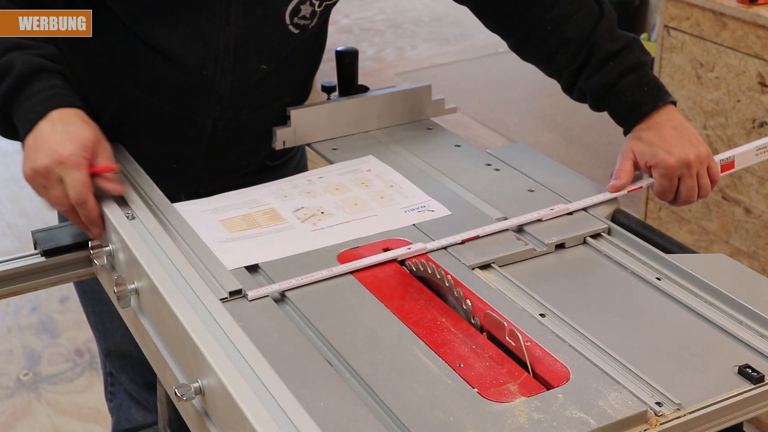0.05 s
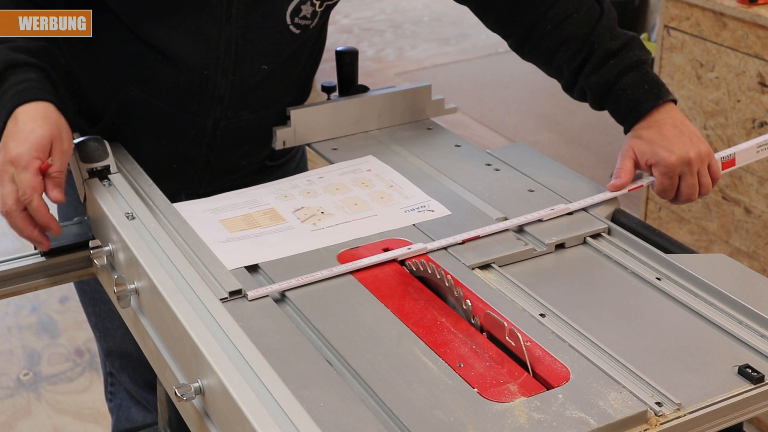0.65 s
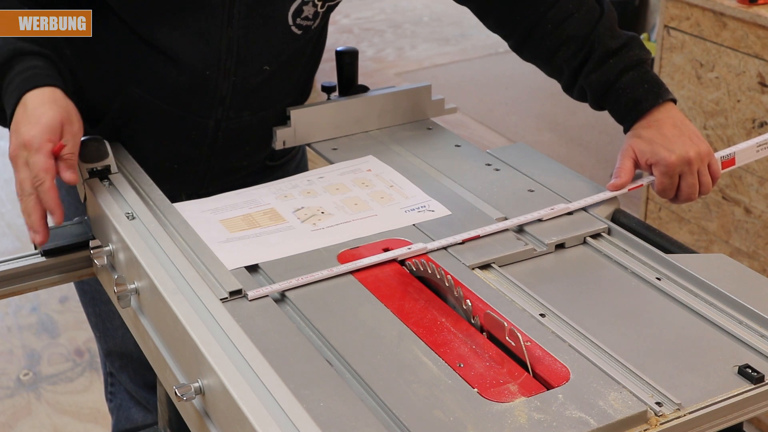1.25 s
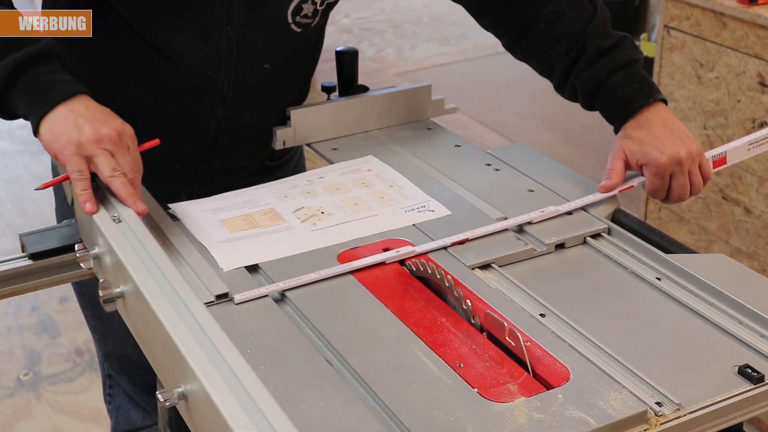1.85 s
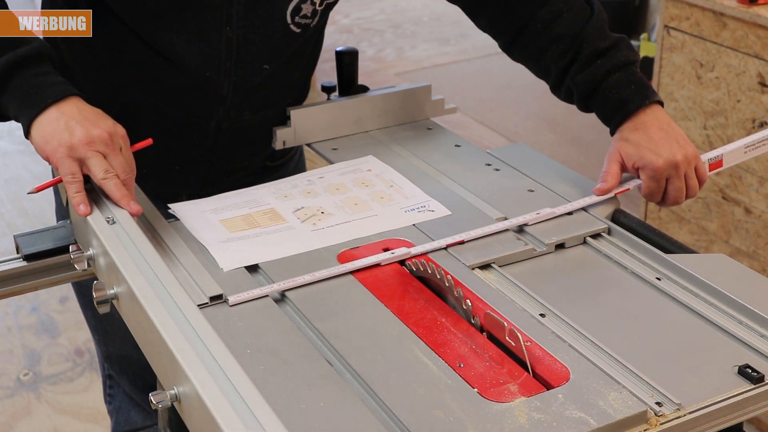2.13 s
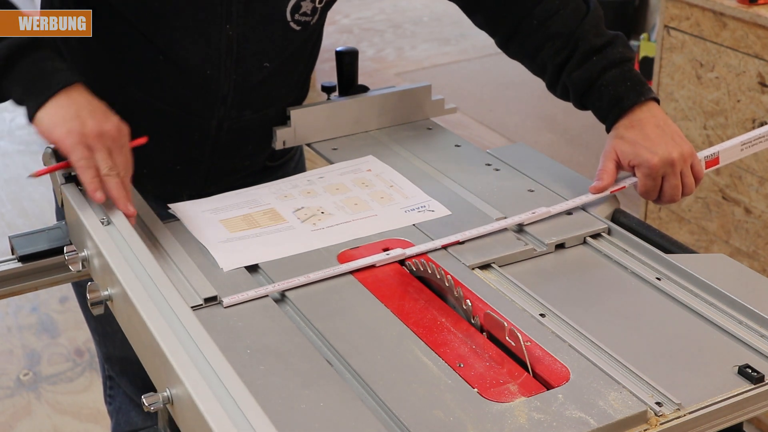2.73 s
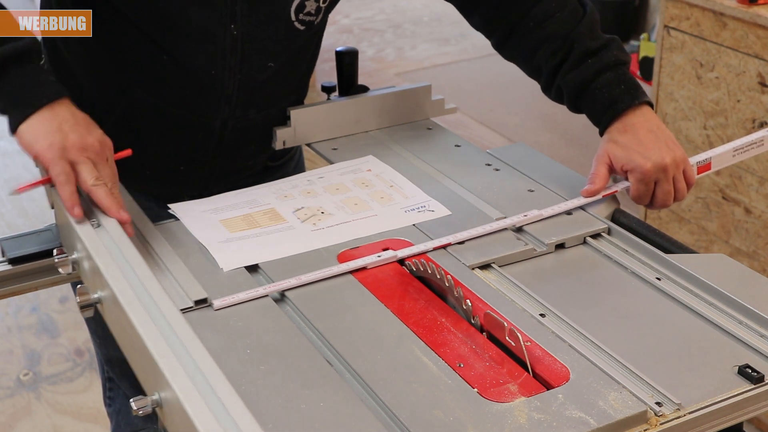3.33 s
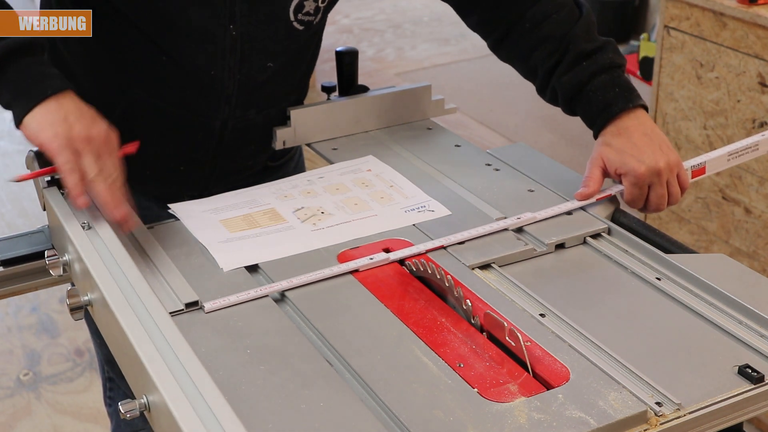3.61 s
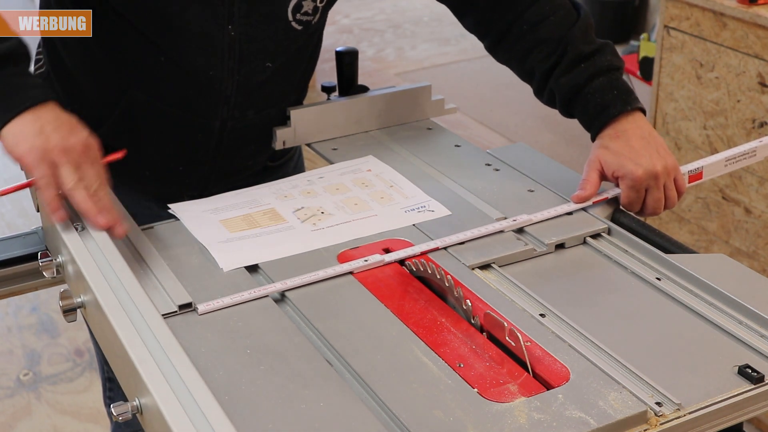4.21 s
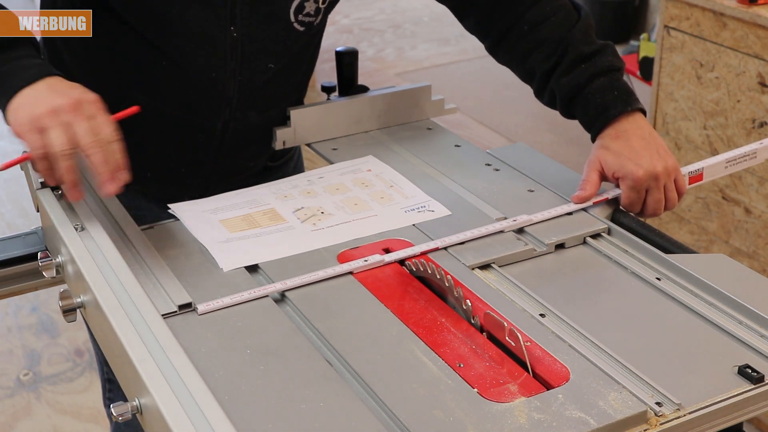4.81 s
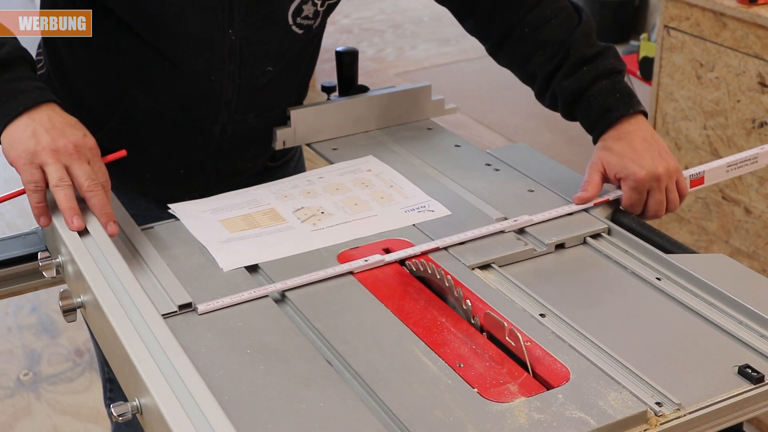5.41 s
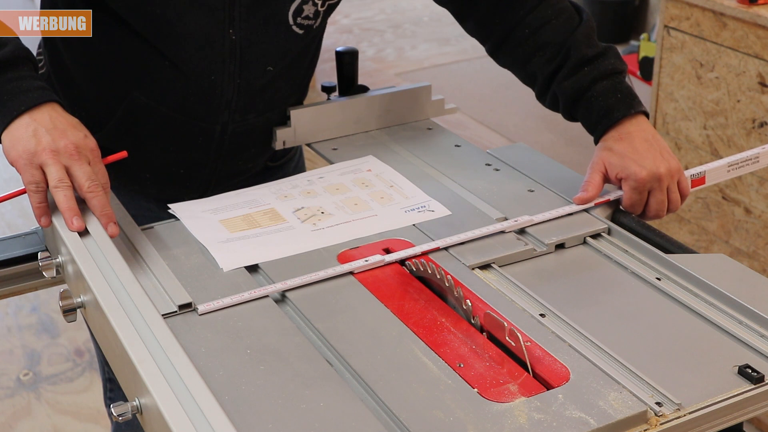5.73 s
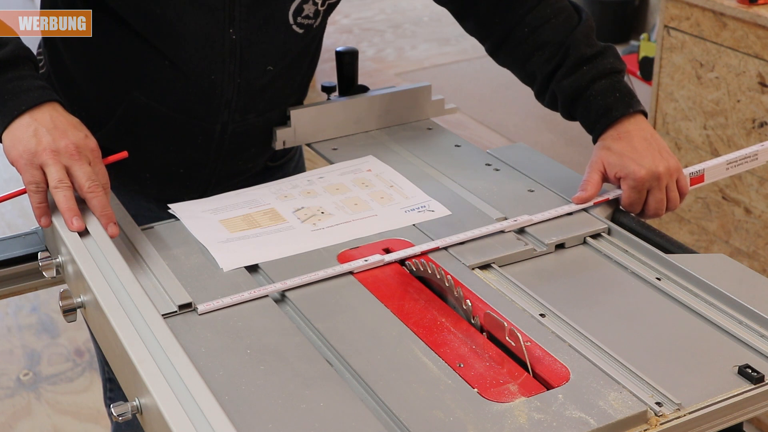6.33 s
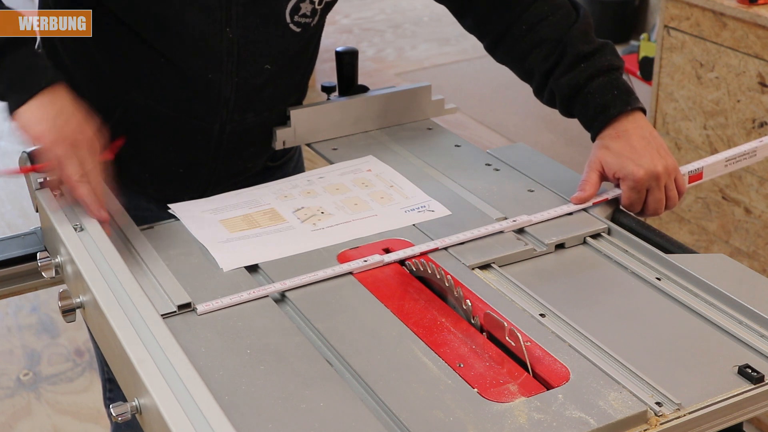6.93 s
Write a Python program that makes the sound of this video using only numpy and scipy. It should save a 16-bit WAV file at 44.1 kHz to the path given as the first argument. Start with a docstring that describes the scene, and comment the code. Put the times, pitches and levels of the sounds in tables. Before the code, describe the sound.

A hand adjusts the aluminium fence of an idle table saw, heard close and in stereo in a small workshop with a faint low hum and hiss. From about 0.5 to 1.2 seconds the clamp gives soft metallic clicks and its lever a few dull thuds. Around 1.7 to 2 seconds the fence slides quietly along its rail in two short pushes, with a slight shudder. From 2.7 to 4.7 seconds fingers nudge it with about ten louder knocks, roughly five a second. Each clacks, rattles and rings briefly over a low thump from the table, some with a sharp metal click. Between 3 and 4.1 seconds several end in a tiny scrape and high squeak. Only a few faint taps come between 5.4 and 6 seconds. A knock at 6.8 seconds and a firmer one at 7 end with a short, squeaky skid.

```python
"""Setting a table saw fence

A small workshop, close to an idle table saw, in mid-side stereo over a faint hum and hiss. A hand sets the
aluminium fence against a folding ruler: the clamp clicks, the fence is pushed along its rail, then nudged
on by light knocks of the fingers. Each knock makes it chatter in its play and ring, and sets the table
swinging; after some it skids a little, and stick-slip on the rail makes it squeak."""
import sys
import numpy as np
from scipy import signal
from scipy.fft import rfft, irfft, next_fast_len
from scipy.io import wavfile
from scipy.ndimage import uniform_filter1d

SR = 44100
rng = np.random.default_rng(int(sys.argv[2]) if len(sys.argv) > 2 else 0)


def waveform_to_disk(signal):
    """Save audio, clipped to [-1, 1], as 16-bit WAV at the path in sys.argv[1]."""
    frames = np.transpose(np.atleast_2d(signal))
    scaled = np.clip(frames, -1, 1) * 32767
    samples = np.round(scaled).astype(np.int16)
    wavfile.write(sys.argv[1], SR, samples)


N = 311478
TIME = np.arange(N) / SR
TAIL = TIME[:2 ** 15]  # seconds since a contact

# room tone in the mid and in the side channel: freq_hz, level_db
HISS_MID = [(20, -14), (35, -5), (60, -5), (100, 0), (135, -0.8), (200, -2), (450, -6), (900, -10.5),
            (2000, -14), (4000, -19), (8000, -26.5), (11500, -33), (14000, -47)]
HISS_SIDE = [(20, -10), (60, -30), (150, -8), (450, -6.5), (1200, -10), (3000, -14.5), (7000, -23.5),
             (11500, -32), (14000, -29)]
# decay of the workshop's echo, and of the metal's dense ring: freq_hz, t60_s
ROOM_DECAY = [(80, 0.61), (250, 0.99), (600, 0.75), (2000, 0.43), (5000, 0.68), (11000, 0.48)]
METAL_DECAY = [(80, 0.97), (300, 0.4), (1500, 0.35), (4000, 0.29), (11000, 0.095)]
# clear modes of the fence, relative to its dense ring: pitch_hz, level_db, t60_s
FENCE_MODES = [(226, 9, 0.44), (281.9, 5, 0.2), (311, 1.5, 0.2), (412.8, -1, 0.31), (461.8, 0.5, 0.15),
               (552, 7, 0.097), (592.4, 1, 0.26), (704, 3, 0.31), (854.5, 10.5, 0.15), (933, 9.5, 0.06),
               (1260, -0.5, 0.18), (1423, -7.5, 0.32), (1580, 1, 0.028), (1770, 1.5, 0.14), (2005, 4, 0.29),
               (2265, 4.5, 0.021), (2762, 5.5, 0.05), (3180, 7, 0.041), (3530, 0, 0.029), (4220, 0, .07),
               (4650, 2, 0.091), (5830, 6, 0.026)]
# what the fence radiates toward the microphone: freq_hz, gain_db
FENCE_COLOUR = [(30, -34), (60, -10), (110, -7), (170, -1.5), (198, -7.5), (225, 0), (280, 3), (480, -1.5),
                (750, -6.5), (1150, -10), (1750, -11.5), (2350, -17.5), (2780, -21), (3000, -24.5),
                (3200, -24.5), (4600, -32.5), (5200, -35.5), (5800, -36), (10500, -44), (13000, -55)]
# stereo width of the handling: freq_hz, side_gain_db
STEREO_WIDTH = [(60, -25), (200, -46), (500, -19.5), (1200, -12.5), (2000, -11), (3200, -3.5), (6000, 2.5),
                (11000, 5.5)]
# slow pushes along the rail: start_s, length_s, level_db, relative_grit_db
RAIL_PUSHES = [(-.08, 0.19, -68.5, 14.5), (1.65, 0.18, -52, 2), (1.851, 0.14, -50.5, -6)]
# colour of steady sliding friction: freq_hz, gain_db
FRICTION_COLOUR = [(60, 6), (160, 4), (228, -2), (290, -0.5), (520, -2), (850, -2.5), (2000, 5), (4000, 6),
                   (10000, 9.5)]
# finger knocks: start_s, level_db, chatter_s, bite_db, clack_db, edge_db, hand_weight_db, bending_db
FINGER_KNOCKS = [(0.505, -56, 0.02, 10, 5, 13, -60, -54), (0.642, -54, .037, 0, 3, 7, -85, -75),
                 (0.809, -50.5, 0.0086, 6.5, 1, 11.5, -60, -54.5),
                 (1.084, -51.5, 0.021, 7.5, 5, 8, -61.5, -55), (2.547, -64.5, 0.0068, -8, -9, 12, -83, -62),
                 (2.704, -37, 0.022, 4, 4, -2, -55, -49),
                 (2.953, -34, 0.0095, -1.5, -0.5, -3.5, -53.5, -45),
                 (3.159, -37.5, 0.011, -1.5, -2, 1, -53.5, -65),
                 (3.366, -34, 0.014, 0.5, 2.5, -1.5, -56.5, -43),
                 (3.57, -33.5, 0.015, -0.5, 1, -0.5, -58.5, -42.5),
                 (3.776, -39, 0.034, -2.5, 0.5, -5, -60.5, -51), (3.974, -42.5, 0.0078, -5, 5, 4, -75, -70),
                 (3.981, -28.5, 0.01, 2, 2.5, -6, -51, -36.5), (4.182, -42, 0.017, 4, -2.5, -1, -53, -43),
                 (4.408, -31, 0.014, 1.5, 4, -6, -48, -41.5),
                 (4.619, -35.5, 0.0065, 2, -1.5, -1, -49.5, -60),
                 (4.639, -37.5, 0.005, -15, -1, -8, -62, -61), (5.401, -64.5, 0.016, 6, -1, -7, -88, -83),
                 (5.773, -60.5, 0.017, -3, 0, -9, -89, -70), (5.989, -54.5, 0.004, 9, 12, -4, -86, -51),
                 (6.786, -40, 0.021, -2.5, -9, -3, -64, -44.5), (6.994, -51, 0.0067, -1, 3, 4, -80, -75),
                 (7.005, -31.5, 0.0097, -7, 4.5, 0, -63, -37)]
# low modes of the saw table, and slow bending of the whole fence: pitch_hz, level_db, t60_s
TABLE_MODES = [(70, -21, 0.94), (81.3, 3, 1), (143.6, -3, 0.68), (175, -2, 1), (234.8, -1, 0.49)]
BENDING_MODES = [(228.5, -2, 0.29), (285, -1, 0.51), (321.7, -1.5, 0.45)]
# long notes of the fence's hollow profile: pitch_hz, level_db, t60_s
PROFILE_MODES = [(581, -1, 0.51), (899, -1.5, 0.57), (1063, -4.5, 0.4), (1213, -1.5, 0.11),
                 (1546, -10.5, 0.47), (2230, -9, 0.37), (2790, -34, 0.46), (4670, -23, 0.2)]
# the hand bears down on the clamp lever: start_s, length_s, level_db, tilt_db_per_octave
LEVER_BUMPS = [(.52, .06, -58, 0), (0.833, 0.087, -50.5, 1), (1.168, 0.07, -51, -2.5)]
# dull body of the lever and its mount: pitch_hz, level_db, t60_s
LEVER_MODES = [(87, -1, 1), (161.5, -3.5, 0.53), (229, -3, 0.45), (280.4, -0.5, 0.37), (451.4, -7, 0.24),
               (518, -5.5, 0.23)]
# small steel parts of the clamp: pitch_hz, level_db, t60_s
CLAMP_MODES = [(2600, -52, 0.079), (4900, -62, .12), (5700, -50.5, 0.05), (6100, -57, 0.1),
               (10180, -49, 0.016), (10600, -62, 0.03)]
# metal on metal, at the clamp and the rail: start_s, level_db, treble_db
METAL_CLICKS = [(0.586, -58.5, 22.5), (0.606, -63.5, 22), (0.821, -55.5, 9), (1.097, -52.5, 7),
                (1.63, -64, 10), (2.712, -48, 8), (2.722, -46, 8), (2.728, -55, 11), (3.166, -55, 15),
                (3.783, -42.5, 7), (4.013, -46, 12.5), (4.417, -40, 7), (4.436, -42, 0), (6.79, -48, 15),
                (7.002, -48.5, 18.5)]
# taps that land on bare metal: start_s, level_db, tilt_db_per_octave
BARE_TAPS = [(.815, -60.5, 1), (1.096, -56.5, 2), (4.412, -49, 2.5), (4.635, -55.5, 4.5), (5.991, -59.5, 0)]
# what the bare metal rings with: pitch_hz, level_db, t60_s
BARE_MODES = [(1522, -2, 0.28), (1554, -1.5, 0.39), (1530, -7, 0.19), (1720, -8, .3), (2566, -12, .27),
              (2790, -9.5, .3), (3420, -19, .35), (3840, -15, .2), (4250, -17.5, 0.35), (4600, -19.5, 0.22),
              (4660, -16, 0.18)]
# a pressing fingertip drags on the fence: start_s, length_s, level_db
FINGER_DRAGS = [(1.735, 0.11, -53), (1.915, 0.12, -51.5), (2.708, 0.11, -42.5)]
# low modes that the drag shakes: pitch_hz, level_db
DRAG_MODES = [(227.8, 3), (171, -10)]
# short skids along the rail: start_s, length_s, scrape_db, squeak_db, relative_overtone_db
RAIL_SKIDS = [(2.766, 0.098, -47, -76, -20), (3.03, 0.04, -45.5, -55, -20), (3.123, 0.027, -52, -66, -14),
              (3.224, 0.049, -40, -37, -21), (3.425, 0.04, -37.5, -36.5, -19),
              (3.631, 0.04, -39.5, -39, -19), (3.673, 0.027, -42.5, -60, -14),
              (4.051, 0.04, -41.5, -34, -23), (6.873, 0.047, -56, -62, -22),
              (7.009, 0.037, -34.5, -38.5, -24), (7.046, 0.024, -44, -34.5, -22)]
# colour of a skid's scrape: freq_hz, gain_db
SCRAPE_COLOUR = [(300, 2.5), (900, 3), (1750, 10.5), (2500, 5.5), (3500, 6.5), (5000, 5), (9000, 5)]

FIRM_DB = -35  # level of a firm knock
WEIGHT_LAG_S = 0.0288  # the hand's weight lands this long after a knock


def undb(db):
    """Decibels to gain."""
    return 10 ** (np.asarray(db) / 20)


def unit(x):
    """Scale to an rms of one."""
    return x / np.sqrt(np.mean(x ** 2))


def lookup(points, hz):
    """Read (freq_hz, value) points on a log-frequency axis."""
    f, value = np.transpose(points)
    return np.interp(np.log(np.maximum(hz, 1)), np.log(f), value)


def causal(x, gain_at):
    """Minimum-phase filter; gain_at gives the gain for an array of frequencies."""
    size = 2 * next_fast_len(x.shape[-1])
    cepstrum = irfft(np.log(gain_at(np.fft.rfftfreq(size, 1 / SR))))
    cepstrum[1:size // 2] *= 2
    cepstrum[size // 2 + 1:] = 0
    return irfft(rfft(x, size) * np.exp(rfft(cepstrum)))[..., :x.shape[-1]]


def colour(x, points):
    """Filter by (freq_hz, gain_db) points."""
    return causal(x, lambda hz: undb(lookup(points, hz)))


def even(x, band_hz=160):
    """Flatten a random burst to unit power, averaged over stretches of band_hz."""
    def gain_at(hz):
        power = np.abs(rfft(x, 2 * len(hz) - 2)) ** 2
        return (uniform_filter1d(power, int(band_hz / hz[1])) + 1e-12) ** -.5
    return causal(x, gain_at)


def through(x, response):
    """Convolve, keeping the length."""
    return signal.fftconvolve(np.atleast_2d(x), np.atleast_2d(response), axes=-1)[:, :x.shape[-1]]


def add(out, s, sound):
    """Mix a sound in at time s."""
    start = max(int(s * SR), 0)
    out[:, start:start + sound.shape[-1]] += sound[..., :max(N - start, 0)]


def wander(size, rate_hz):
    """Smooth random motion with an rms of one, up to about rate_hz."""
    return unit(signal.sosfilt(signal.butter(4, rate_hz, fs=SR, output="sos"), rng.standard_normal(size)))


def grains(size, per_s, spread_db):
    """Tiny random collisions of uneven strength."""
    hits = (rng.random(size) < per_s / SR) * rng.choice([-1, 1], size)
    return hits * undb(spread_db * rng.standard_normal(size))


def dying_noise(t60s, band_count=6):
    """Countless overlapping modes: noise whose bands each die at their own rate."""
    spectrum = rfft(rng.standard_normal(len(TAIL)))
    centres_hz = np.geomspace(80, 11000, band_count)
    place = np.interp(np.fft.rfftfreq(len(TAIL), 1 / SR), centres_hz, np.arange(band_count))
    bands = irfft(spectrum * np.maximum(1 - np.abs(place - np.arange(band_count)[:, None]), 0))
    decay = np.exp(-np.log(1000) * TAIL / lookup(t60s, centres_hz)[:, None])
    return even(np.sum(bands * decay, axis=0))


def swing(modes, press_s, detune, flutter_db):
    """Modes set swinging by one push; the hand's load shifts them and makes them die unevenly."""
    hz, db, t60 = np.transpose(modes)[:, :, None]
    loaded_hz = hz * (1 + detune * rng.standard_normal(hz.shape))
    uneven_db = flutter_db * np.tanh(wander((len(modes), len(TAIL)), rate_hz=23.5))
    envelope = undb(db + uneven_db) * np.exp(-np.log(1000) * TAIL / t60)
    ring = envelope * np.sin(2 * np.pi * (loaded_hz * TAIL + rng.random(hz.shape)))
    return np.sqrt(2) * (1 - np.exp(-TAIL / press_s)) * np.sum(ring, axis=0)


def tilted(modes, db_per_octave):
    """The same modes, brighter or duller as if struck harder or softer."""
    return [(hz, db + db_per_octave * np.log2(hz / modes[0][0]), t60) for hz, db, t60 in modes]


def room_tone(hum_hz=99, hum_db=-68.5, waver=0.018, mid_db=-65.5, side_db=-62):
    """Smooth hiss all round the microphone, and a low, slightly wavering hum in the centre."""
    drift = unit(uniform_filter1d(rng.standard_normal(N), size=4000))
    hum = undb(hum_db) * unit(np.sin(2 * np.pi * np.cumsum(hum_hz * (1 + waver * drift)) / SR))
    mid = undb(mid_db) * unit(colour(rng.standard_normal(N), HISS_MID))
    side = undb(side_db) * unit(colour(rng.standard_normal(N), HISS_SIDE))
    return np.array([mid + hum, side])


def echo(wall_s=.012):
    """Mid and side echo off the workshop's near walls; it differs with the spot that sounds."""
    tail = np.array([dying_noise(ROOM_DECAY), dying_noise(ROOM_DECAY)])
    return np.pad(tail, ((0, 0), (int(wall_s * SR), 0)))[:, :len(TAIL)]


def fence_modes(spot_db=1.5):
    """The clear modes of the fence; how hard each is driven depends on the spot."""
    hz, db, t60 = np.transpose(FENCE_MODES)[:, :, None]
    decay = np.log(1000) / t60
    weight = undb(db - spot_db * rng.standard_normal(hz.shape)) * rng.choice([-1, 1], hz.shape)
    return np.sum(2 * decay / SR * weight * np.exp(-decay * TAIL) * np.sin(2 * np.pi * hz * TAIL), axis=0)


def fence(crack_db=-5, echo_db=-6):
    """One contact as it reaches the microphone, mid and side: crack, clear modes, dense ring and room."""
    mid = dying_noise(METAL_DECAY) + fence_modes()
    mid[0] += undb(crack_db)
    side = dying_noise(METAL_DECAY)
    response = colour(np.array([mid, side]) + undb(echo_db) * echo(), FENCE_COLOUR)
    return response / np.linalg.norm(response[0])


def sliding_speed(s, length_s, attack_s=0.083, release_s=0.051):
    """A push gathers speed, holds it and runs out."""
    return np.clip((TIME - s) / attack_s, 0, 1) * np.exp(-np.maximum(TIME - s - length_s, 0) / release_s)


def pushes(sing_hz=(9750, 10500), sing_db=(-32, -27), width_hz=450, flutter_db=3, grit_hz=3000, grit_db=3):
    """Steady sliding: grains of friction drive the fence; grit makes the rail hiss and sing fitfully."""
    speed = sum(undb(db) * sliding_speed(s, length_s) for s, length_s, db, _ in RAIL_PUSHES)
    gritty = sum(undb(db + extra_db) * sliding_speed(s, length_s)
                 for s, length_s, db, extra_db in RAIL_PUSHES)
    grit = unit(grains(N, per_s=630, spread_db=5))
    grit = signal.lfilter(*signal.butter(2, grit_hz, "high", fs=SR), grit)
    friction = colour(unit(grains(N, per_s=2900, spread_db=5)), FRICTION_COLOUR)
    out = through(speed * friction + undb(grit_db) * gritty * grit, fence())
    for hz, db in zip(sing_hz, sing_db):
        sing = signal.lfilter(*signal.iirpeak(hz, hz / width_hz, SR), rng.standard_normal((2, N)))
        out += undb(db) * gritty * unit(sing * undb(flutter_db * wander(N, rate_hz=17)))
    return out


def contact(db, rise_s, chatter_s, body_db, bite_db, clack_db, edge_db, blow_s=0.061, tick_db=-17):
    """A blow shakes the fence in its play on the rail: a tick, then a dying burst of collisions."""
    tick = signal.lfilter(*signal.butter(2, 6500, "high", fs=SR), signal.unit_impulse(len(TAIL)))
    age, rise = TAIL / (2 * chatter_s), TAIL / rise_s
    shaking = (1 - np.exp(-rise)) * np.exp(-age - (age / 2) ** 2)
    force = even(grains(len(TAIL), per_s=1300, spread_db=5.5) * shaking)
    # the first touch is bright; the low push builds as the contact flattens
    low_push = signal.lfilter(*signal.butter(1, 900, fs=SR), force)
    force = force - np.exp(-rise / 1.04) * low_push + undb(tick_db) * tick
    force = colour(force, [(290, body_db), (1000, 0), (1900, bite_db), (3500, clack_db), (8000, edge_db)])
    return undb(db) * np.sqrt(blow_s * SR) * through(force, fence())


def knocks(rise_s=.0032, firm_body_db=-4, hollow_db_per_db=0.21):
    """Fingers nudge the fence: firm knocks clack, light ones sound hollow."""
    out = np.zeros((2, N))
    for s, db, chatter_s, bite_db, clack_db, edge_db, *_ in FINGER_KNOCKS:
        body_db = firm_body_db + hollow_db_per_db * (FIRM_DB - db)
        add(out, s, contact(db, rise_s, chatter_s, body_db, bite_db, clack_db, edge_db))
    return out


def thumps():
    """Each knock bends the fence, and the hand's weight then sets the table swinging."""
    out = np.zeros((2, N))
    for s, *_, weight_db, bend_db in FINGER_KNOCKS:
        table = swing(TABLE_MODES, press_s=0.0016, detune=0.0254, flutter_db=4)
        bending = swing(BENDING_MODES, press_s=0.031, detune=0.0256, flutter_db=4)
        add(out[:1], s + WEIGHT_LAG_S, undb(weight_db) * table)
        add(out[:1], s, undb(bend_db) * bending)
    return out


def profile_ring(firm_ring_db=-47.5, db_per_db=1.18, side_db=-3):
    """Every knock leaves the hollow profile singing the same few notes, louder after a firm one."""
    out = np.zeros((2, N))
    for s, db, *_ in FINGER_KNOCKS:
        ring_db = firm_ring_db + db_per_db * (db - FIRM_DB)
        notes = swing(PROFILE_MODES, press_s=0.0019, detune=0.0024, flutter_db=2)
        add(out, s, undb(ring_db) * notes * undb([[0], [side_db]]))
    return out


def lever_bumps(release_s=0.028):
    """The lever thuds under the hand, which stays on it and mutes it."""
    out = np.zeros((2, N))
    for s, length_s, db, tilt in LEVER_BUMPS:
        mute = np.exp(-np.maximum(TAIL - length_s, 0) / release_s)
        thud = swing(tilted(LEVER_MODES, tilt), press_s=0.0058, detune=.015, flutter_db=2)
        add(out[:1], s, undb(db) * mute * thud)
    return out


def finger_pads(pad_db=-1, swell_s=0.0088, soft_hz=330):
    """After each knock the soft fingertips land with the hand's weight and give the fence a dull push."""
    force = np.zeros((1, N))
    press = TAIL / swell_s * np.exp(1 - TAIL / swell_s)
    for s, *_, weight_db, _ in FINGER_KNOCKS:
        add(force, s + WEIGHT_LAG_S, undb(weight_db) * press * rng.standard_normal(len(TAIL)))
    softened = signal.sosfilt(signal.butter(3, soft_hz, fs=SR, output="sos"), force)
    return undb(pad_db) * through(softened, fence())


def clamp(start_s=.585):
    """One snap sets the clamp's small steel parts pinging."""
    out = np.zeros((2, N))
    hz, db, t60 = np.transpose(CLAMP_MODES)[:, :, None]
    phase = rng.uniform(0, 2 * np.pi, (2, len(CLAMP_MODES), 1))
    envelope = undb(db) * np.exp(-np.log(1000) * TAIL / t60)
    add(out, start_s, np.sum(envelope * np.sin(2 * np.pi * hz * TAIL + phase), axis=1))
    return out


def clicks(rise_s=0.0002, chatter_s=0.0022, body_db=-1):
    """Metal meets metal: a very short, bright blow on the fence."""
    out = np.zeros((2, N))
    for s, db, treble_db in METAL_CLICKS:
        add(out, s, contact(db, rise_s, chatter_s, body_db, treble_db / 2, treble_db, treble_db))
    return out


def tings(side_db=-2):
    """A tap on bare metal leaves a thin, bright ring."""
    out = np.zeros((2, N))
    for s, db, tilt in BARE_TAPS:
        ring = swing(tilted(BARE_MODES, tilt), press_s=0.0015, detune=.002, flutter_db=3)
        add(out, s, undb(db) * ring * undb([[0], [side_db]]))
    return out


def judders(attack_s=.018, release_s=.03, waver=0.021, flutter_db=2):
    """A dragged fingertip sticks and slips, and the fence shudders briefly on its low modes."""
    out = np.zeros((2, N))
    for s, length_s, db in FINGER_DRAGS:
        drag = np.clip(np.minimum(TAIL / attack_s, (length_s - TAIL) / release_s), 0, 1)
        phase_per_hz = 2 * np.pi * np.cumsum(1 + waver * wander(len(TAIL), rate_hz=44)) / SR
        shudder = sum(undb(mode_db) * np.sin(hz * phase_per_hz) for hz, mode_db in DRAG_MODES)
        grip = undb(flutter_db * wander(len(TAIL), rate_hz=23))
        add(out[:1], s, undb(db) * drag * unit(shudder * grip))
    return out


def squeak(overtone_db, pitch_hz=1958, beat_hz=1750, beat_db=-12, overtone_hz=3550, flutter_db=2):
    """Uneven stick-slip locks onto the notes of the rail, never quite at the same pitch."""
    tuning = 1 + .0015 * rng.standard_normal()
    waver = .016 * wander(len(TAIL), rate_hz=360)
    phase_per_hz = 2 * np.pi * np.cumsum(tuning + waver) / SR
    grip = undb(flutter_db * wander(len(TAIL), rate_hz=330))
    notes = [(pitch_hz, 0), (beat_hz, beat_db), (overtone_hz, overtone_db)]
    return unit(grip * sum(undb(db) * np.sin(hz * phase_per_hz) for hz, db in notes))


def skids(attack_s=0.0016, release_s=0.011, fade_db_per_s=60, side_db=-3, echo_db=-13):
    """The fence skids on after a knock, scraping and squeaking, and fades as it slows."""
    out = np.zeros((2, N))
    for s, length_s, scrape_db, squeak_db, overtone_db in RAIL_SKIDS:
        ramp = np.clip(np.minimum(TAIL / attack_s, (length_s - TAIL) / release_s), 0, 1)
        slip = np.sin(np.pi / 2 * ramp) ** 2 * undb(-fade_db_per_s * TAIL)
        friction = slip * unit(grains(len(TAIL), per_s=1400, spread_db=6.5))
        scrape = through(colour(friction, SCRAPE_COLOUR), fence())
        direct = slip * squeak(overtone_db)
        squeak_in_room = np.outer([1, undb(side_db)], direct) + undb(echo_db) * through(direct, echo())
        add(out, s, undb(scrape_db) * scrape + undb(squeak_db) * squeak_in_room)
    return out


def scene():
    """The handling and the room tone at the microphone, decoded from mid and side to left and right."""
    blows = knocks() + clicks() + clamp() + finger_pads()
    resonances = thumps() + profile_ring() + tings() + lever_bumps()
    sliding = judders() + skids() + pushes()
    mid, side = blows + resonances + sliding
    mid, side = np.array([mid, colour(side, STEREO_WIDTH)]) + room_tone()
    return np.array([mid + side, mid - side])


def record(dry):
    """The recorder cuts the top steeply above 12750 Hz."""
    return signal.sosfilt(signal.ellip(8, .2, 60, 12750, fs=SR, output="sos"), dry)


dry = scene()
out = record(dry)
waveform_to_disk(out)
```